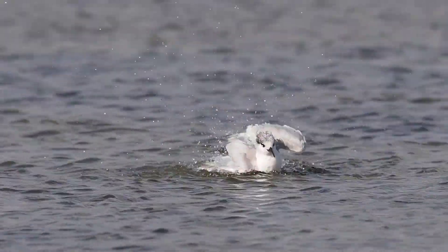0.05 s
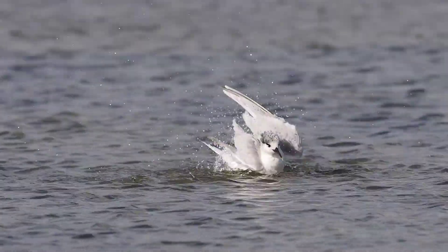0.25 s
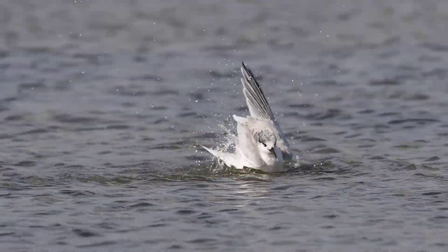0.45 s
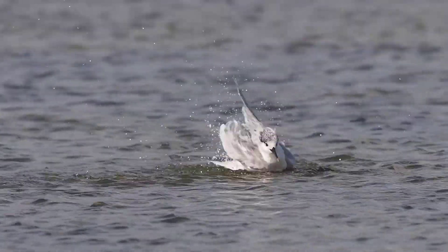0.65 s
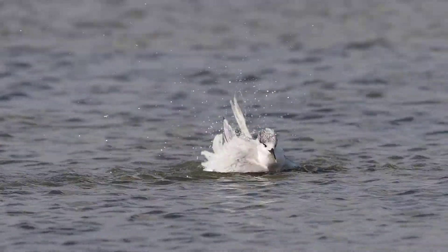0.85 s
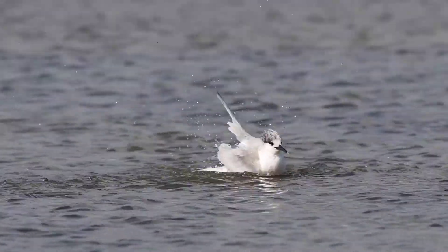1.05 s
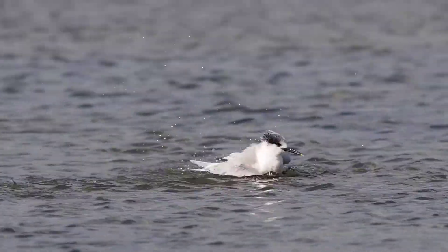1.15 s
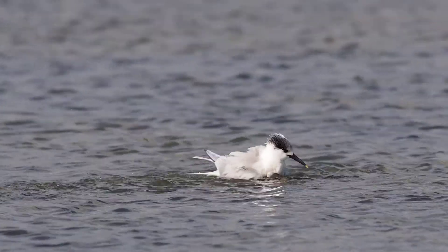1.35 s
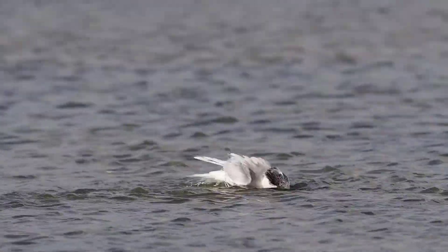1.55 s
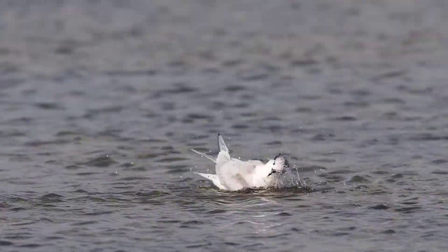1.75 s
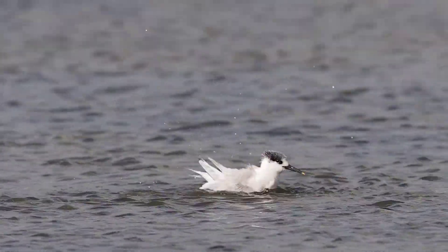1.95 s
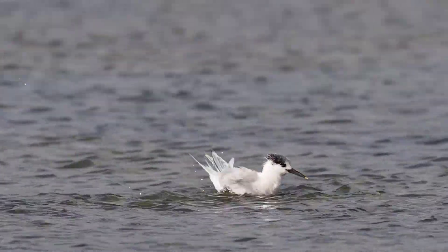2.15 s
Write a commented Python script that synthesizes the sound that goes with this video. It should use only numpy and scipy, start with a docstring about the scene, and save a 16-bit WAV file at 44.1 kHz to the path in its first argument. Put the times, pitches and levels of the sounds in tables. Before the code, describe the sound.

A tern gives one harsh screech that rises, then falls away. Before it, a bathing bird slaps the lake with its wings a few times. Water laps softly throughout, and wind briefly bumps the left microphone.

```python
"""A tern screeches beside a shallow, windy lake while another bathes, slapping the water with its wings.
The screech has two voices: a high one rises and starts to catch as the low one joins, then the low
one falls away alone. Water laps, bubbles fizz, drops plink and wind buffets the left microphone.
A faint gull-like call opens the scene, and a small bird trills near the end."""
import sys
import numpy as np
from scipy import signal
from scipy.fft import rfft, irfft
from scipy.io import wavfile
from scipy.ndimage import uniform_filter1d

SR = 44100
rng = np.random.default_rng(int(sys.argv[2]) if len(sys.argv) > 2 else 0)


def generate_wav(signal):
    """Clip the signal to [-1, 1] and save it as 16-bit WAV at the path in sys.argv[1]."""
    frames = np.transpose(np.atleast_2d(signal))
    scaled = np.clip(frames, -1, 1) * 32767
    pcm = np.round(scaled).astype(np.int16)
    wavfile.write(sys.argv[1], SR, pcm)


N = 97020
T = np.arange(N) / SR


def gain(db):
    return 10 ** (np.asarray(db) / 20)

def curves(table):
    """A curve over time for each column after the first, then an on/off gate with soft edges."""
    times, *columns = np.array(table, float).T
    gate = np.clip(np.minimum(T - times[0], times[-1] - T) / .0042 + 1, 0, 1)
    return [np.interp(T, times, c) for c in columns] + [gate]

def band(x, hz, width_hz):
    """Keep the frequencies around hz."""
    low = max(np.hypot(hz, width_hz / 2) - width_hz / 2, 10)
    edges = [low, min(low + width_hz, .45 * SR)]
    return signal.sosfilt(signal.butter(2, edges, "band", fs=SR, output="sos"), x)

def wobble(per_s):
    """A smooth random curve that strays by about 1."""
    hold = int(SR / per_s)
    steps = np.repeat(rng.standard_normal(N // hold + 1), hold)
    return 1.82 * uniform_filter1d(uniform_filter1d(steps, hold), hold)[:N]

def phase(hz):
    return 2 * np.pi * np.cumsum(hz) / SR

def fade(start, decay_s):
    return (T > start) * np.exp(-np.abs(T - start) / decay_s)

def stereo(x, pan_db=0, lag_s=0):
    """The left side is pan_db louder and lag_s later than the right."""
    return np.array([np.interp(T - lag_s, T, x) * gain(pan_db / 2), x * gain(-pan_db / 2)])

def pips(table):
    """Short tones that swell and fade; a glide of 0.1 slides from 10% below the pitch to 10% above."""
    out = np.zeros((2, N + SR))
    for at, db, hz, half_s, glide, pan_db in table:
        u = np.arange(-int(half_s * SR), int(half_s * SR)) / (half_s * SR)
        start = max(int((at - half_s) * SR), 0)
        tone = gain(db) * np.exp(-5 * u ** 2) * np.sin(phase(hz * (1 + glide * u)))
        out[:, start:start + len(u)] += tone * gain(np.array([[pan_db], [-pan_db]]) / 2)
    return out[:, :N]

# The lake's tone. Each row: frequency in Hz, relative level in dB.
LAKE_TONE = [(15, -44), (25, -14), (140, 0), (221, -6.5), (359, -7.5), (399, -11.5), (495, -11.5),
             (1270, -19), (2490, -23.5), (2850, -29.5), (8810, -37.5), (15500, -50)]
# How wide it sounds. Each row: frequency in Hz, dB of what the sides differ by against what they share.
LAKE_WIDTH = [(60, -27), (110, -20), (200, -17), (380, -7.5), (700, -8), (1290, -3.5), (2380, -1.5),
              (4400, 2), (8120, -1), (15000, 2)]
# The slow drift of its hiss. Each row: time in seconds, relative level in dB.
LAKE_HISS = [(0, -63.5), (.55, -62.5), (1.0, -63.5), (1.45, -65.5), (1.9, -64.5), (2.2, -66)]

def lake(level_db=-42.5, swell_db=.35, flicker_db=.6):
    """Wind and lapping water: bands of noise that swell together and flicker separately."""
    octaves = np.log2(np.maximum(np.arange(N // 2 + 1) * SR / N, 1))
    def spectrum(table):
        hz, db = np.array(table).T
        return gain(np.interp(octaves, np.log2(hz), db))
    shared, side = (rfft(rng.standard_normal(N)) * spectrum(LAKE_TONE) for _ in range(2))
    side *= spectrum(LAKE_WIDTH)
    both = np.array([shared + side, shared - side])
    hiss_db = curves(LAKE_HISS)[0]
    out, swell = 0, swell_db * wobble(4.28)
    for centre in np.arange(4, 14.5, .5):
        share = np.clip(1 - 2 * np.abs(octaves - centre), 0, 1)
        drift = (hiss_db - hiss_db.mean()) * np.clip((centre - 10) / 2, 0, 1)  # only above 1 kHz
        out += irfft(both * share, N) * gain(drift + swell + flicker_db * wobble(12.58))
    return out * gain(level_db) / np.sqrt(np.mean(out ** 2))

def fizz(per_s=300, quietest_db=-62.5):
    """Many tiny bubbles and droplets ring at random; the higher ones are shorter."""
    when, pitch, loudness, length, side = rng.random((int(per_s * N / SR), 5)).T
    hz = 1200 * 9 ** pitch
    db = quietest_db - 2.5 * np.log(1 - loudness)
    glide = np.full_like(hz, .1)
    return pips(zip(when * N / SR, db, hz, (3 + 8 * length) / hz, glide, 12 * (side - .5)))

# A distant bird's note. Each row: time in seconds, pitch in Hz, level in dB.
FAR_NOTE = [(0, 1150, -56), (.03, 1320, -57), (.065, 1450, -53), (.1, 1500, -55), (.125, 1500, -64)]

def far_call():
    """A faint gull-like note wavers as it rises."""
    hz, db, gate = curves(FAR_NOTE)
    angle = phase(hz * (1 + .025 * wobble(144)))
    tone = np.sin(angle) + .15 * np.sin(2 * angle)
    return stereo(np.sqrt(2) * gate * gain(db + 2 * wobble(64)) * tone)

# Water drops. Each row: middle in seconds, level in dB, pitch in Hz, half-length in seconds,
# glide, pan in dB.
PLINKS = [(.045, -51, 2750, .008, .05, 8), (.066, -48, 3030, 0.0059, .05, -2),
          (.247, -51, 2680, .01, .05, -4), (.329, -48.5, 3680, 0.0066, .05, 1),
          (.351, -48, 2500, .01, .05, 5), (.37, -45, 2076, 0.018, 0.18, -2),
          (1.908, -47.5, 1960, 0.027, 0.16, 0), (1.985, -42.5, 1194, .025, 0.13, 1),
          (2.11, -47, 1470, .015, 0.13, 0), (2.128, -61, 2230, .03, .4, 0)]

def drops():
    """Drops plink into the lake, each sliding up in pitch."""
    return pips(PLINKS)

# Wing beats. Each row: start in seconds, level in dB, frequency of the bright part in Hz, pan in dB.
WING_BEATS = [(.13, -27, 5250, 2), (.3055, -30.5, 4100, 1.5), (0.484, -40, 2780, 0),
              (0.671, -30, 5200, -3.5), (.861, -36, 4440, -4)]

def wing_slaps(lead_s=.0045, slap_s=.001, spray_s=.012, body_hz=1940):
    """A wing hits the water: a small tick, the slap and a short spray."""
    out = 0
    for at, db, hz, pan_db in WING_BEATS:
        tick = gain(-5) * fade(at - lead_s, slap_s)
        spray = gain(-14) * np.exp(-np.abs(T - at) / spray_s)
        water = rng.standard_normal(N) * (tick + fade(at, slap_s) + spray)
        burst = band(water, hz, 1.4 * hz) + gain(.5) * band(water, body_hz, 3000)
        burst = signal.sosfilt(signal.butter(4, 10000, fs=SR, output="sos"), burst)
        out += stereo(gain(db) * burst * np.sqrt(SR / (8 * hz)), pan_db, lag_s=3e-5)
    return out

# Droplets. Each row: start in seconds, level in dB, frequency in Hz, band width in Hz, pan in dB.
DROPLETS = [(.318, -48, 6400, 3000, 0), (.834, -55, 7500, 2000, 0), (1.117, -47, 9800, 4000, -2),
            (1.126, -44.5, 7500, 2500, -5), (1.4682, -35.5, 7830, 1290, -10), (1.938, -55, 9000, 2500, 0)]

def droplet_ticks(crack_s=.00089, tail_s=.0054):
    """Droplets land with a sharp crack and a short tail."""
    out = 0
    for at, db, hz, width_hz, pan_db in DROPLETS:
        burst = rng.standard_normal(N) * (fade(at, crack_s) + gain(-12) * fade(at, tail_s))
        tick = band(band(burst, hz, width_hz), hz, 2 * width_hz)
        out += stereo(gain(db) * np.sqrt(SR / 4 / width_hz) * tick, pan_db)
    return out

# Soft plops. Each row: middle in seconds, level in dB, frequency in Hz, half-length in seconds.
PLOPS = [(1.22, -46, 2050, .006), (1.957, -46, 890, .01), (1.978, -46.5, 1310, 0.013)]

def plops():
    """Small splashes make short, dull swells of noise."""
    out = 0
    for at, db, hz, half_s in PLOPS:
        water = band(band(rng.standard_normal(N), hz, hz), hz, hz)
        swell = np.exp(-((T - at) / half_s) ** 2)
        out += stereo(gain(db) * np.sqrt(SR / 2 / hz) * water * swell)
    return out

# Puffs of wind. Each row: peak time in seconds, level in dB, pitch in Hz, build-up in seconds.
PUFFS = [(1.436, -27.5, 87, 0.01), (1.4528, -10.5, 208, 0.0032), (1.755, -21, 180, 0.0017),
         (1.7664, -25, 216, 0.0031), (1.7745, -22.5, 197, 0.0024), (1.817, -29, 130.4, 0.0035),
         (1.836, -25.5, 93.7, 0.0064)]

def wind_buffets(stop_s=.002, right_db=-24):
    """Wind hits the left microphone: a low swing of pressure builds up and stops short."""
    out = 0
    for at, db, hz, build_s in PUFFS:
        rise = np.exp(-np.abs(T - at) / build_s)
        fall = np.exp(-((T - at) / stop_s) ** 2 / 2)
        out += gain(db) * np.cos(2 * np.pi * hz * (T - at)) * np.where(T < at, rise, fall)
    return out * gain([[0], [right_db]])

# The start of the screech. Each row: time in seconds, pitch in Hz, level in dB.
WHISTLE = [(1.5, 2636, -58), (1.51, 2616, -42.5), (1.526, 2780, -32), (1.533, 2720, -52)]

def tern_whistle():
    """The tern opens with a brief pure tone."""
    hz, db, gate = curves(WHISTLE)
    return gate * gain(db) * np.sin(phase(hz))

# The high voice. Each row: time in seconds, pitch in Hz, levels of harmonics 1 and 2 in dB,
# roughness from 0 to 1. A harmonic is a tone at a whole multiple of the pitch.
HIGH_VOICE = [(1.531, 1300, -58, -32.5, 0.65), (1.54, 1317, -51.5, -34.5, 0.6),
              (1.56, 1334, -43.5, -31.5, 0.25), (1.578, 1360, -41.5, -28, 0.1), (1.59, 1373, -41, -26, 0.1),
              (1.606, 1385, -41, -24.5, 0.08), (1.614, 1392, -46, -26, 0.48),
              (1.64, 1415, -43, -22.5, 0.37), (1.675, 1439, -40.5, -25, 0.54), (1.7, 1464, -37, -26, 0.55),
              (1.74, 1471, -36.5, -26.5, 0.57), (1.748, 1457, -42, -29, 0.56)]
# Catches, where level and pitch dip. Each row: middle in seconds, depth in dB, half-length in seconds.
VOICE_CATCHES = [(1.613, 4.5, 0.0032), (1.632, 9, 0.0027), (1.649, 5.5, 0.0019), (1.658, 4, 0.0021),
                 (1.666, 5, 0.0019), (1.68, 4.5, 0.0025), (1.69, 5, 0.0023), (1.698, 3.5, 0.002),
                 (1.709, 16, 0.00313), (1.722, 17.5, 0.0019), (1.733, 19, 0.0024)]
# Air in the throat. Each row: frequency in Hz, band width in Hz, level in dB against harmonic 2.
THROAT_AIR = [(1540, 700, -25), (3700, 1300, -18.5), (5500, 680, -32), (8470, 2400, -30)]
# Levels in dB against harmonic 2: first of harmonics 3 to 8, then of 1.5, 2.5 and 3.5 times the pitch.
HIGH_TOP_DB = [-18.5, -28.5, -32, -30, -35, -47]
BETWEEN_DB = [-26, -16.5, -36]

def tern_high_voice(sag_per_db=.004, between_end_s=1.58):
    """A rough, rising voice that catches. Returns its sound and its phase."""
    hz, db1, db2, rough, gate = curves(HIGH_VOICE)
    dip_db = sum(db * np.exp(-((T - at) / half_s) ** 2) for at, db, half_s in VOICE_CATCHES)
    angle = phase(hz * (1 - sag_per_db * dip_db + .015 * rough * wobble(450)))
    top = sum(gain(db + 3.4 * rough * wobble(200)) * np.sin(k * angle)
              for k, db in enumerate(HIGH_TOP_DB, 3))
    # At first, strong and weak cycles take turns, adding tones between the harmonics.
    between = sum(gain(db + 3.9 * wobble(149.6)) * np.sin((k + .5) * angle)
                  for k, db in enumerate(BETWEEN_DB, 1))
    between *= np.clip((between_end_s - T) / .012, 0, 1)
    rasp = rough * gain(3.5 * wobble(120))
    rasp *= sum(gain(db) * np.sqrt(SR / width) * band(rng.standard_normal(N), centre, width)
                for centre, width, db in THROAT_AIR)
    first = gain(db1 + 3.2 * rough * wobble(200)) * np.sin(angle)
    overtones = gain(-dip_db) * np.sin(2 * angle) + gain(-dip_db / 3) * top
    return gate * (first + gain(db2) * (overtones + between + rasp)), angle

# The low voice joining in. Each row: time in seconds, pitch in Hz, level in dB.
LOW_ENTRY = [(1.606, 1228, -73), (1.615, 1218, -43), (1.66, 1237, -53), (1.7, 1237, -42),
             (1.745, 1229, -42)]
# Tones the two voices make. Each row: multiple of the high pitch, multiple of the low pitch.
BLEND = [(0, 1), (0, 2), (0, 3), (2, 1), (1, 1), (1, 2), (3, 1)]
# The level of each of those tones, in dB against the joining voice.
BLEND_DB = [-21, -10, 0.5, 1, -1, -14, -11]

def tern_voices_mixing(high_angle):
    """The low voice joins the high one, and new tones appear at sums of their pitches."""
    hz, level_db, gate = curves(LOW_ENTRY)
    low_angle = phase(hz * (1 + .012 * wobble(200)))
    return gate * sum(gain(level_db + db + 3.1 * wobble(120)) * np.sin(a * high_angle + b * low_angle)
                      for (a, b), db in zip(BLEND, BLEND_DB))

# The low voice alone. Each row: time in seconds, pitch in Hz, levels of harmonics 1 to 4 in dB.
LOW_VOICE = [(1.748, 1237, -37.5, -45, -38, -50), (1.76, 1212, -35.5, -45, -33, -52),
             (1.78, 1186, -41.5, -44, -41.5, -50), (1.818, 1114, -36.5, -44.5, -37, -53.5),
             (1.846, 1050, -47, -45, -49, -54), (1.866, 998, -40, -42, -47.5, -48.5),
             (1.884, 895, -42.5, -43, -50, -53), (1.892, 892, -42.5, -52, -62, -54),
             (1.9, 896, -53, -44, -50, -61)]
# Its top harmonics: their numbers, then their starting levels in dB against harmonic 4.
LOW_TOP = [5, 6, 8, 9]
LOW_TOP_DB = [-5.5, -15, -13, -9]

def tern_low_voice(waver=.0054, fade_db_per_s=25):
    """The low voice falls in pitch while its top harmonics die away."""
    hz, *levels, gate = curves(LOW_VOICE)
    angle = phase(hz * (1 + waver * wobble(240)))
    body = sum(gain(db + 1.17 * wobble(100)) * np.sin(k * angle) for k, db in enumerate(levels, 1))
    fading_db = levels[3] - fade_db_per_s * (T - LOW_VOICE[0][0])
    top = sum(gain(fading_db + db + 3.2 * wobble(60.4)) * np.sin(k * angle)
              for k, db in zip(LOW_TOP, LOW_TOP_DB))
    return gate * (body + top)

# The bird turning. Each row: time in seconds, how much later the left side hears it in seconds.
TERN_TURN = [(1.74, 7e-5), (1.76, 5e-5)]

def with_shore_echo(call, echo_db=-19, decay_s=.03):
    """The call arrives directly, and the shore scatters it back differently to each side."""
    t = np.arange(int(.15 * SR)) / SR
    scatter = rng.standard_normal((2, len(t))) * np.exp(-t / decay_s) / np.sqrt(decay_s * SR / 2)
    echo = signal.fftconvolve(call[None], scatter, axes=1)[:, :N]
    return stereo(call, lag_s=curves(TERN_TURN)[0]) + gain(echo_db) * echo

# A small bird's notes. Each row: middle in seconds, level in dB, pitch in Hz, half-length in seconds,
# glide, pan in dB.
TRILL_NOTES = [(1.9, -56, 5270, 0.0091, -.05, 0), (1.911, -48.5, 4700, 0.0068, -.05, 4),
               (1.922, -47, 4345, .008, -.03, 0), (1.933, -47, 4080, .008, -0.036, 6),
               (1.944, -45, 3970, 0.0057, -.02, 7), (1.954, -51, 3650, .008, -.02, 0),
               (1.965, -49, 3400, .01, 0, 0)]

def trill():
    """A small bird sings a quick run of falling pips."""
    return pips(TRILL_NOTES)

def scene():
    """Birds, water and wind added together in stereo."""
    whistle = tern_whistle()
    high, high_angle = tern_high_voice()
    screech = np.sqrt(2) * (whistle + high + tern_voices_mixing(high_angle) + tern_low_voice())
    birds = with_shore_echo(screech) + far_call() + trill()
    water = fizz() + drops() + wing_slaps() + droplet_ticks() + plops() + lake()
    return birds + water + wind_buffets()

def record(dry, shade_hz=1210, shade_db=-2.5, top_hz=15850):
    """The left microphone hears less treble, and both sides lose the very highest sounds."""
    bass = signal.lfilter(*signal.butter(1, shade_hz, fs=SR), dry[0])
    left = bass + gain(shade_db) * (dry[0] - bass)
    return signal.sosfilt(signal.ellip(10, .2, 80, top_hz, fs=SR, output="sos"), [left, dry[1]])


dry = scene()
out = record(dry)
generate_wav(out)
```